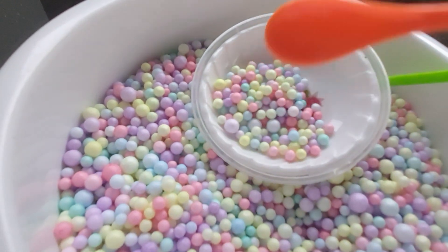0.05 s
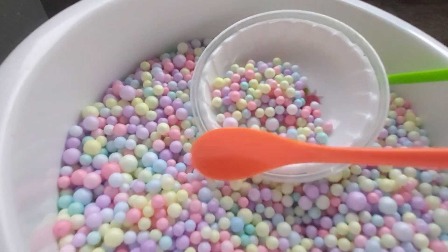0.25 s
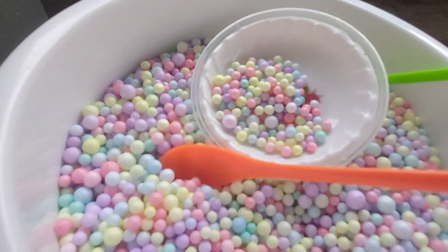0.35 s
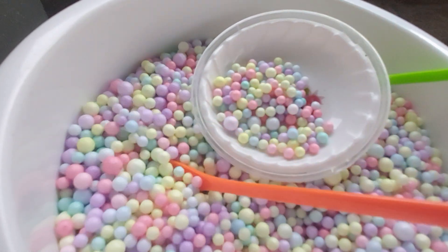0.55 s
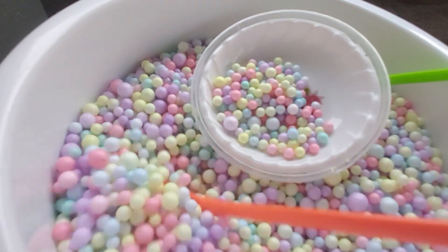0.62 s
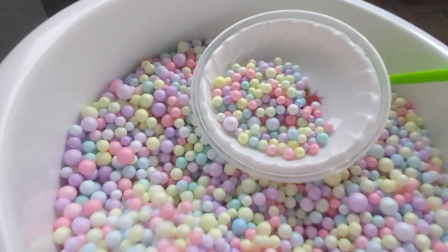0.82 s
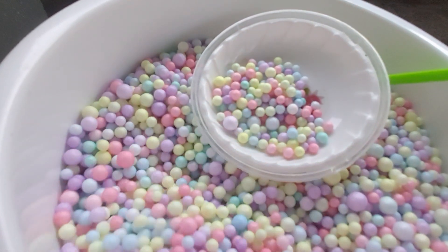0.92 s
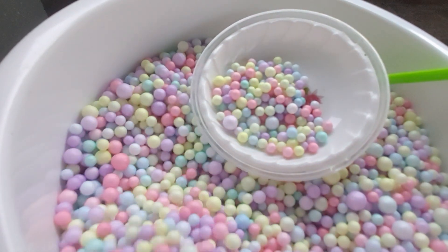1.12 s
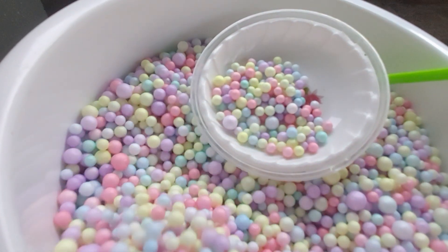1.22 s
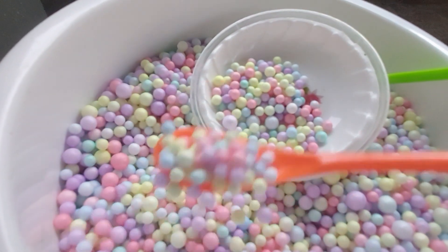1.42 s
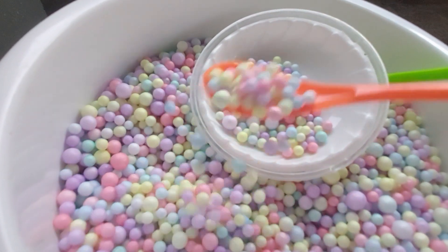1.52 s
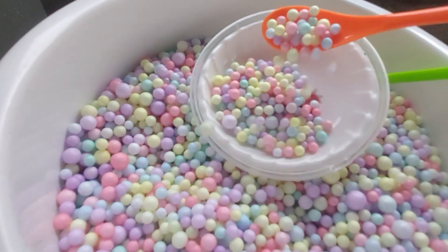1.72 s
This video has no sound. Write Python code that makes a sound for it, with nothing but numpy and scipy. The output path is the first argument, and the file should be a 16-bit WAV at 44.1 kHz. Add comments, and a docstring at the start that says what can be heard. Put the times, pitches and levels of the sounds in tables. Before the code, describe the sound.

Foam beads crunch and hiss close up as a plastic spoon digs into a tub. At 0.25 seconds the spoon taps a thin bowl. Digs follow around 0.4 and 0.65 seconds, with soft hollow booms, a knock near 0.7 and dull scraping until 0.9. From 1 second the rustle fades and loose beads tick down, some hitting the bowl after 1.5. A low room rumble lies underneath.

```python
"""Foam beads crunch and hiss in thousands of tiny contacts as a plastic spoon digs twice into their tub
and lifts a spoonful out. The spoon first taps a thin bowl, then scrapes and knocks on the tub, which
booms softly under the push; loose beads tick as they drop. Underneath sits the low rumble of a small
room. All is heard close up, through two microphone ports of unlike tone."""
import sys
import numpy as np
from scipy import signal
from scipy.fft import rfft, irfft
from scipy.io import wavfile

SR = 44100
rng = np.random.default_rng(int(sys.argv[2]) if len(sys.argv) > 2 else 0)


def store_pcm(level_fs):
    """Save levels as 16-bit WAV."""
    pcm = np.round(np.clip(level_fs, -1, 1) * 32767).astype(np.int16)
    wavfile.write(sys.argv[1], SR, np.atleast_2d(pcm).T)


N = 77175

# ride of the room rumble: t/s, level/dB
RUMBLE_LEVEL = [(0,-47),(0.2,-48),(0.35,-42.5),(0.7,-44),(0.9,-47),(1.12,-50.5),(1.33,-42),(1.55,-45.5),(1.75,-48)]
# tone of the rumble, the room air and the reverb tail: f/Hz, level/dB
RUMBLE_EQ = [(20,-33),(36,-12),(48,-8.5),(72,1),(100,-5.5),(160,-12),(230,-21.5),(300,-16.5),(800,-62)]
AIR_EQ = [(100,8),(260,5),(420,3),(580,-0.5),(750,-9),(1100,-16.5),(1700,-16),(3000,-31.5),(4200,-24.5),(7000,-27),(10000,-17.5),(12500,-28),(16000,-32)]
REVERB_EQ = [(200,-3.5),(700,5.5),(2000,-6.5),(5000,-5.5),(16000,-37)]
# tone of each microphone port: f/Hz, level/dB
LEFT_PORT_EQ = [(80,-2),(400,-7.5),(1000,6.5),(2200,11),(4200,3),(5500,-4),(7200,-10.5),(8400,-18),(9500,-0.5),(11000,15.5),(12200,18.5),(13500,14),(15700,11.5)]
RIGHT_PORT_EQ = [(80,-1.5),(400,-10),(1000,3),(2200,5.5),(3600,-0.5),(4800,-7.5),(7200,-7.5),(9600,6.5),(11500,2),(15700,4.5)]

# rides of the dragging spoon's scrape and of the tub's drone: t/s, level/dB
SCRAPE_LEVEL = [(0.27,-73),(0.31,-46.5),(0.36,-63),(0.45,-56),(0.55,-63),(0.70,-54.5),(0.84,-56.5),(0.91,-44.5),(0.95,-62),(1.04,-64),(1.12,-83)]
DRONE_LEVEL = [(0.26,-55.5),(0.31,-29.5),(0.36,-44.5),(0.41,-30.5),(0.455,-33),(0.48,-35.5),(0.54,-47),(0.61,-52.5),(0.65,-32),(0.70,-46),(0.90,-49.5),(1.0,-57),(1.4,-61),(1.75,-62)]
# tone of the dull scrape and the hollow drone: f/Hz, level/dB
SCRAPE_EQ = [(150,-29.5),(330,-3.5),(480,5),(700,-7),(1000,-14.5),(2500,-26.5)]
DRONE_EQ = [(50,-22.5),(90,-7.5),(165,-10.5),(205,-10),(233,3),(250,-7),(270,4.5),(305,-8.5),(380,-9),(1200,-50.5)]
# low thuds in the tub, mostly the spoon's shoves, the last one under a landing bead: t/s, level/dB, attack/s
SHOVES = [(0.2442,-12.5,0.0023),(0.298,-4.5,0.0039),(0.315,-0.5,0.001),(0.448,10.5,0.0095),(0.486,0,0.005),(0.512,8,0.0033),(0.649,8.5,0.016),(0.907,-12,0.0022),(1.5203,-27,0.0014)]
# loose beads land: t/s, click level/dB, ping level/dB, pitch ratio, left minus right/dB
TICKS = [(1.034,-5,-1,1.2,2),(1.138,-14,2,1.3,7),(1.172,-13,0,0.82,6),(1.271,-7.5,-9,0.71,9),(1.374,-15,-18,0.97,2),(1.427,-14.5,-32,1.1,7),(1.478,-12.5,-28,1.15,15),(1.499,-14,-23,1.1,19),(1.576,-20,-4,1.06,5),(1.596,-14,-14,0.73,6),(1.625,-4.5,-10,1.5,7),(1.646,-14,-26,1.1,3),(1.7008,-3,-0.5,1.02,6.5)]
# hits on plastic (bead on bowl, spoon on bowl, spoon on tub wall):
# t/s, ring level/dB, crack level/dB, tilt/(dB per octave), pitch ratio, left minus right/dB
DROPS = [(1.5205,-11,-19,4,0.98,-6),(1.6185,0.5,-22,3.5,1.021,4),(1.6725,-7,-18,0,1.0,6.5)]
TAPS = [(0.2457,-2.5,-9.5,0.5,0.99,0.5),(0.2568,-23,-20,4.5,0.89,1),(0.2615,-22,-90,6,1.0,1)]
KNOCKS = [(0.6712,0,1,0,1.0,0),(0.878,-15,-24,0,1.0,2),(0.892,-25,-18,0,1.0,1),(0.910,-16,-26,-2,.95,2)]
# tone of a bead's click and of a hit's crack: f/Hz, level/dB
TICK_EQ = [(600,-26),(1200,1),(3200,-16),(4050,14.5),(4900,11),(8000,12),(12000,-1),(16000,0)]
CRACK_EQ = [(300,-56),(900,-25.5),(2000,4),(4000,14),(7000,11.5),(11000,0.5),(16000,5)]
# ring of the plastic under a shove, tick, drop, tap and knock: f/Hz, level/dB, t60/s
TUB_MODES = [(103,-21,0.24),(238,7.5,0.047),(271,-3.5,0.036),(324,-16,0.017)]
PING_MODES = [(1153,-64.5,.035),(4060,-49.5,0.033)]
DROP_MODES = [(1125,0,.035),(1560,-8,.012),(1900,1,.012),(2820,-1,.018),(4150,-7,.012),(4900,-9,.01)]
BOWL_MODES = [(700.4,-6,0.069),(786,4,0.012),(1098,1,.026),(1060,-4.5,0.017),(1460,-1.5,0.013),(1720,-4,0.008),(2200,-13.5,0.018),(2680,-21,0.0077),(3960,-17,0.021),(10450,-21,0.013),(15200,-36,.01)]
WALL_MODES = [(530,-3.5,0.015),(934,-16,0.021),(1100,-0.5,0.018),(1274,-1,0.0093),(1650,0,0.014),(1715,-18,0.11),(1873,-4.5,0.025),(2660,-7.5,0.022),(4100,-6,0.0082)]

# ride of the beads pushed by the spoon: t/s, crunch level/dB, hiss level/dB
STIR_LEVELS = [(0.25,-67,-45),(0.28,-51.5,-52.5),(0.315,-41.5,-63.5),(0.36,-48,-50.5),(0.38,-44,-52.5),(0.40,-37.5,-42.5),(0.43,-36.5,-44),(0.456,-36.5,-38.5),(0.48,-49.5,-46.5),(0.51,-49,-40),(0.53,-51,-51.5),(0.585,-58,-55),(0.62,-63,-62.5),(0.632,-62,-47),(0.643,-44.5,-34),(0.662,-52.5,-44),(0.70,-40.5,-48),(0.75,-48,-47),(0.86,-53,-50),(0.885,-52,-46.5),(0.915,-51,-50),(0.94,-59.5,-56.5),(1.02,-64.5,-60.5),(1.036,-63.5,-54),(1.06,-63,-55.5),(1.11,-67,-62),(1.14,-59.5,-51),(1.21,-57.5,-55.5),(1.28,-56,-51.5),(1.40,-66.5,-58),(1.50,-69,-60.5),(1.62,-69,-61.5),(1.75,-79,-64.5)]
# grain density of the stirred beads: t/s, rate/(contacts per s)
CONTACT_RATE = [(0.3,4300),(0.45,13000),(0.8,16400),(1.25,8400),(1.45,6000),(1.75,3300)]
# ride of the settling spoonful: t/s, level/dB
SETTLE_LEVEL = [(1.15,-100),(1.33,-70),(1.45,-65.5),(1.62,-70),(1.75,-60.5)]
# tone of the three bead layers: f/Hz, level/dB
CRUNCH_EQ = [(150,-23),(350,-5),(550,-2.5),(850,-1.5),(1800,-3.5),(2800,-5.5),(4200,-14),(7000,-12),(16000,-59)]
HISS_EQ = [(800,-38.5),(2200,0),(3300,1),(4100,9),(5000,6.5),(7000,3.5),(10000,-6),(16000,-7.5)]
CRACKLE_EQ = [(1000,-32),(4000,-16),(8000,-9),(11000,-1.5),(16000,3.5)]

GRAIN_SPREAD_DB, STEREO_SCATTER = 7, 0.33
GRAIN_LAG_S, LAG_SPREAD_S = 0.00017, 0.00007  # lags: how much later the right port hears a source
BOWL_LAG_S, WALL_LAG_S = 0.00004, 0.00018


def undb(db):
    """Decibels to gain."""
    return 10 ** (np.asarray(db) / 20)


def curve(rows, column=1):
    """One column of a table, joined by straight lines in time."""
    rows = np.array(rows)
    return np.interp(np.arange(N) / SR, rows[:, 0], rows[:, column])


def unit(x):
    """Scale to rms 1."""
    return x / np.sqrt(np.mean(x ** 2))


def response(eq, size=4096):
    """Minimum-phase impulse response of an EQ curve."""
    hz, db = np.array(eq).T
    f = np.maximum(np.fft.rfftfreq(size, 1 / SR), 1)
    gain = undb(np.interp(np.log(f), np.log(hz), db))
    cepstrum = irfft(np.log(gain))
    cepstrum[1:size // 2] *= 2
    cepstrum[size // 2 + 1:] = 0
    return irfft(np.exp(rfft(cepstrum)))


def convolve(x, impulse):
    """Pass sound through an impulse response."""
    return signal.fftconvolve(np.atleast_2d(x), np.atleast_2d(impulse), axes=1)[:, :N]


def colour(x, eq):
    """Shape the spectrum, keeping the power of white noise."""
    impulse = response(eq)
    return convolve(x, impulse / np.sqrt(np.sum(impulse ** 2)))


def low_cut(x, hz, order):
    """High-pass filter."""
    return signal.sosfilt(signal.butter(order, hz, "high", fs=SR, output="sos"), x)


def place(out, start_s, sound, pan_db=0, lag_s=0):
    """Spot a sound in time and pan it; the right port gets it lag_s later."""
    sound = np.broadcast_to(sound, (2, sound.shape[-1]))
    for port, (lag, side) in enumerate([(0, 1), (lag_s, -1)]):
        i = int((start_s + lag) * SR)
        part = sound[port, :N - i]
        out[port, i:i + len(part)] += part * undb(side * pan_db / 2)


def modes(table, t, pitch=1, tilt_db=0):
    """Decaying sines of a struck object; a harder contact tilts them towards the treble."""
    return sum(undb(db + tilt_db * np.log2(hz / table[0][0]))
               * np.sin(2 * np.pi * hz * pitch * t)
               * np.exp(-np.log(1000) * t / t60) for hz, db, t60 in table)


def snap(t, decay_s):
    """A tiny burst of contact noise, partly different at each port."""
    noise = np.sign(rng.standard_normal((3, len(t))))
    return (noise[0] + STEREO_SCATTER * noise[1:]) * np.exp(-t / decay_s)


def grains(per_s):
    """Random clicks of slipping contacts, each with its own size and stereo position."""
    chance = np.clip(per_s / SR, 1e-4, 1)
    fires = rng.random(N) < chance
    spread, position, left, right = rng.standard_normal((4, N))
    size = undb(GRAIN_SPREAD_DB * np.clip(spread, -2, 2)) * fires / np.sqrt(chance)
    sign = rng.choice([-1, 1], N)
    lag_s = GRAIN_LAG_S + LAG_SPREAD_S * position
    arrival = np.clip(np.round(np.arange(N) + SR * lag_s), 0, N - 1).astype(int)
    left_clicks = size * (sign + STEREO_SCATTER * left)
    right_clicks = np.bincount(arrival, size * (sign + STEREO_SCATTER * right), N)
    return unit(np.array([left_clicks, right_clicks]))


def strike(hits, table, lag_s, body_db, crack_db=-19.5, attack_s=0.00035):
    """Hits on plastic: each is a bright crack over a short hollow ring."""
    t = np.arange(SR // 4) / SR
    body, crack = np.zeros((2, 2, N))
    attack = 1 - np.exp(-t / attack_s)
    for s, ring_db, snap_db, tilt_db, pitch, pan_db in hits:
        place(body, s, undb(body_db + ring_db) * modes(table, t, pitch, tilt_db) * attack, pan_db, lag_s)
        place(crack, s, undb(crack_db + snap_db) * snap(t, decay_s=0.0011), pan_db, lag_s)
    return body + colour(crack, CRACK_EQ)


def room_tone(air_db=-57.5):
    """The bed: a low rumble, nearly mono, and faint, wider room air."""
    def bed(eq, width):
        noise = rng.standard_normal(N) + width * rng.standard_normal((2, N))
        return unit(colour(noise, eq))
    rumble = bed(RUMBLE_EQ, width=0.27) * undb(curve(RUMBLE_LEVEL))
    return rumble + bed(AIR_EQ, width=1.0) * undb(air_db)


def reverb(x, send_db=-14, t60_s=0.21, attack_s=0.0013):
    """A short diffuse tail from the tub's walls and the room."""
    t = np.arange(SR // 2) / SR
    envelope = np.exp(-np.log(1000) * t / t60_s) * (1 - np.exp(-t / attack_s))
    tail = rng.standard_normal((2, len(t))) * envelope
    tail /= np.sqrt(np.sum(tail ** 2) / 2)
    return undb(send_db) * convolve(convolve(x, tail), response(REVERB_EQ))


def spoon_scrape():
    """The spoon's back sticks and slips on the tub under the beads."""
    return colour(grains(per_s=2500) * undb(curve(SCRAPE_LEVEL)), SCRAPE_EQ)


def tub_boom(trim_db=-26):
    """The low end: cushioned shoves, and one late landing bead, boom in the tub, and the dragging spoon keeps
    it droning."""
    t = np.arange(SR // 5) / SR
    booms = np.zeros((2, N))
    for s, db, attack_s in SHOVES:
        attack = 1 - np.exp(-t / attack_s)
        place(booms, s, undb(trim_db + db) * modes(TUB_MODES, t) * attack, lag_s=WALL_LAG_S)
    drone = colour(rng.standard_normal(N) * undb(curve(DRONE_LEVEL)), DRONE_EQ)
    return booms + drone


def bead_ticks(click_trim_db=-37):
    """Single beads roll off the spoon and land; the plastic pings, each spot at its own pitch."""
    t = np.arange(SR // 20) / SR
    clicks, pings = np.zeros((2, 2, N))
    for s, click_db, ping_db, pitch, pan_db in TICKS:
        place(clicks, s, undb(click_trim_db + click_db) * snap(t, decay_s=0.0012), pan_db)
        place(pings, s, undb(ping_db) * modes(PING_MODES, t, pitch), pan_db)
    return colour(clicks, TICK_EQ) + pings


def bead_drops():
    """Beads fall from the spoon on the bare bowl and ring it lightly."""
    return strike(DROPS, DROP_MODES, BOWL_LAG_S, body_db=-46.5)


def bowl_taps():
    """The spoon taps the thin bowl and rebounds; the bowl radiates little below its lowest mode."""
    return low_cut(strike(TAPS, BOWL_MODES, BOWL_LAG_S, body_db=-16), hz=646, order=6)


def wall_knocks():
    """The spoon knocks on the tub wall and flicks free."""
    return strike(KNOCKS, WALL_MODES, WALL_LAG_S, body_db=-22)


def bead_rustle(crunch_trim_db=-4, hiss_trim_db=-0.5):
    """Packed beads crunch, those on the surface hiss, and the lifted ones crackle as they settle."""
    t, per_s = np.arange(N) / SR, curve(CONTACT_RATE)
    touched, lifted = t > STIR_LEVELS[0][0], t > SETTLE_LEVEL[0][0]
    crunch = grains(per_s) * touched * undb(curve(STIR_LEVELS, column=1) + crunch_trim_db)
    hiss = grains(per_s) * touched * undb(curve(STIR_LEVELS, column=2) + hiss_trim_db)
    crackle = grains(per_s=150) * lifted * undb(curve(SETTLE_LEVEL))
    return colour(crunch, CRUNCH_EQ) + colour(hiss, HISS_EQ) + colour(crackle, CRACKLE_EQ)


def scene():
    """The mix: beads, spoon, bowl and tub up close, with their reverb, over the room tone."""
    close = bead_rustle() + bowl_taps() + wall_knocks() + bead_drops() + bead_ticks()
    close += tub_boom() + spoon_scrape()
    return close + reverb(close) + room_tone()


def record(dry, top_hz=15900):
    """Each port adds its tone (the left a deep notch and a bright peak); sub and extreme top are cut."""
    ports = np.array([response(LEFT_PORT_EQ), response(RIGHT_PORT_EQ)])
    heard = low_cut(convolve(dry, ports), hz=38, order=4)
    high_cut = signal.ellip(10, 0.2, 80, top_hz, fs=SR, output="sos")
    return signal.sosfilt(high_cut, heard)


dry = scene()
out = record(dry)
store_pcm(out)
```